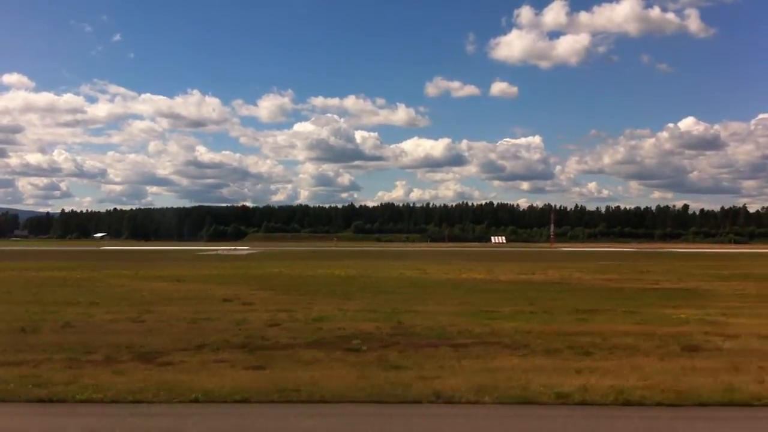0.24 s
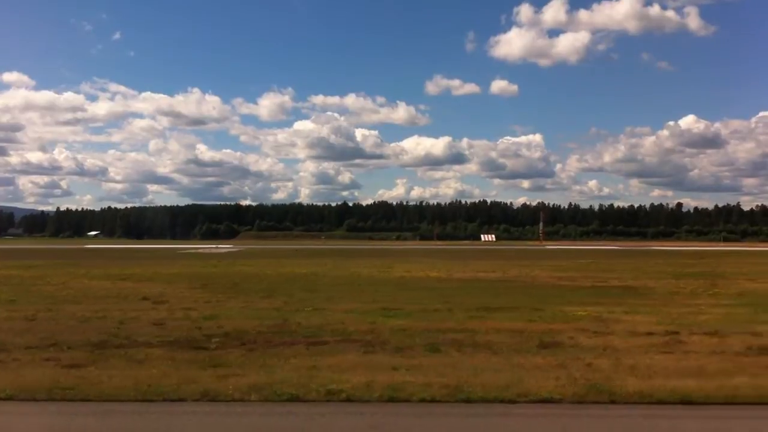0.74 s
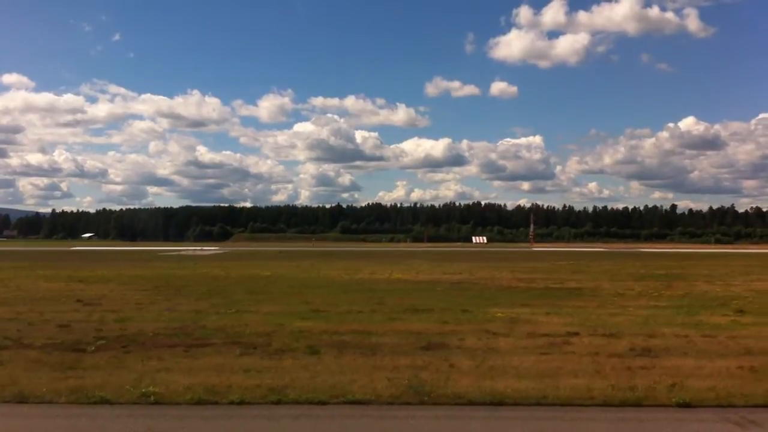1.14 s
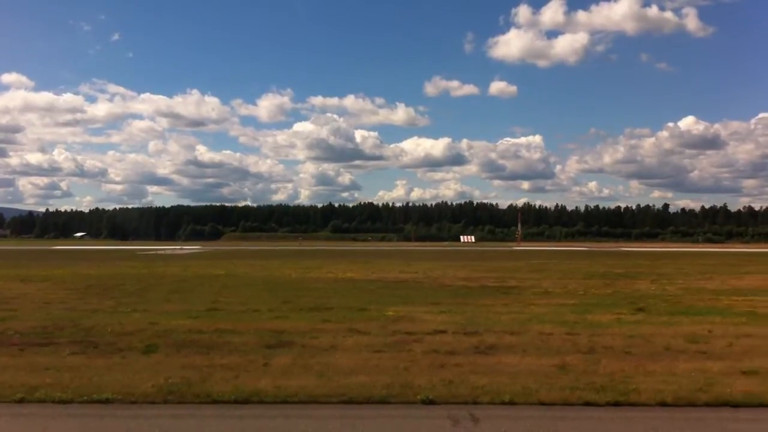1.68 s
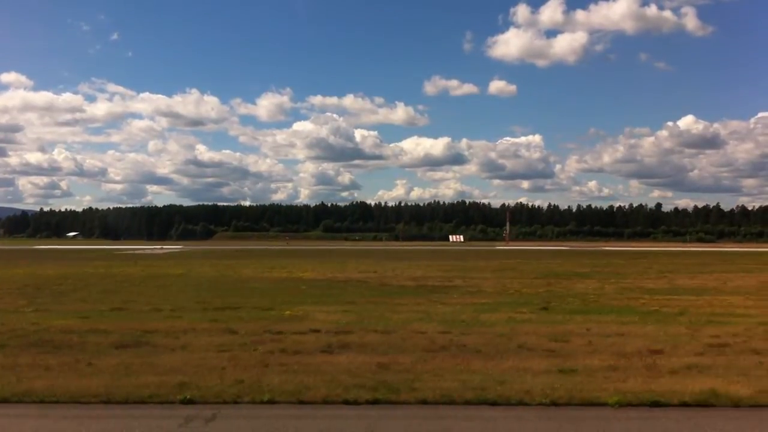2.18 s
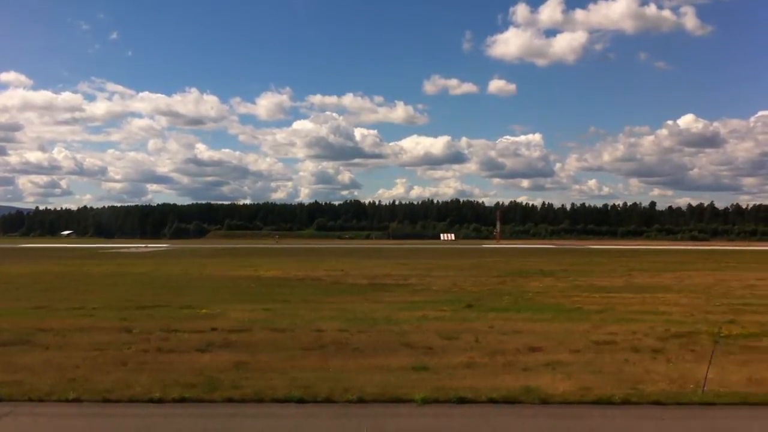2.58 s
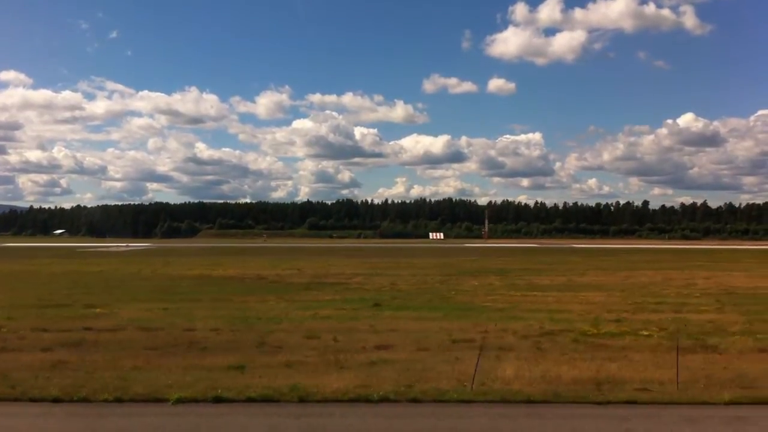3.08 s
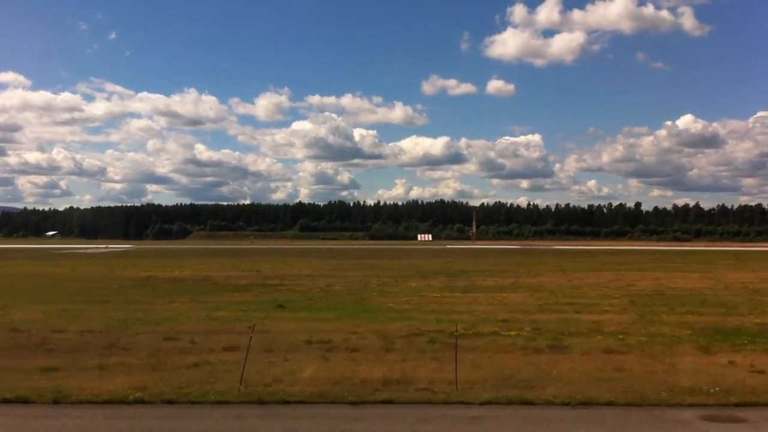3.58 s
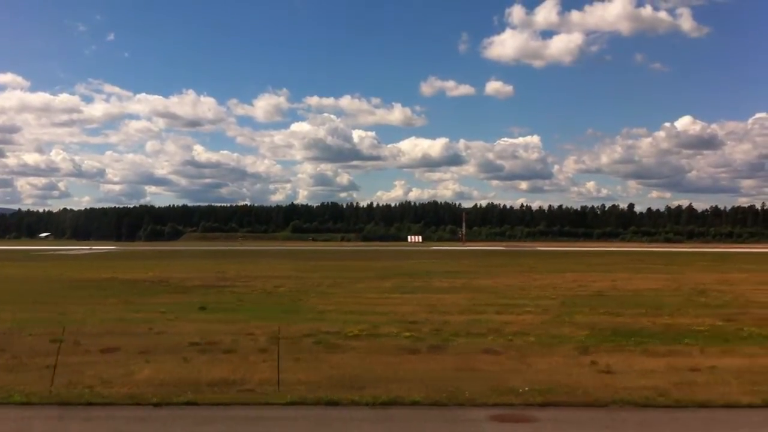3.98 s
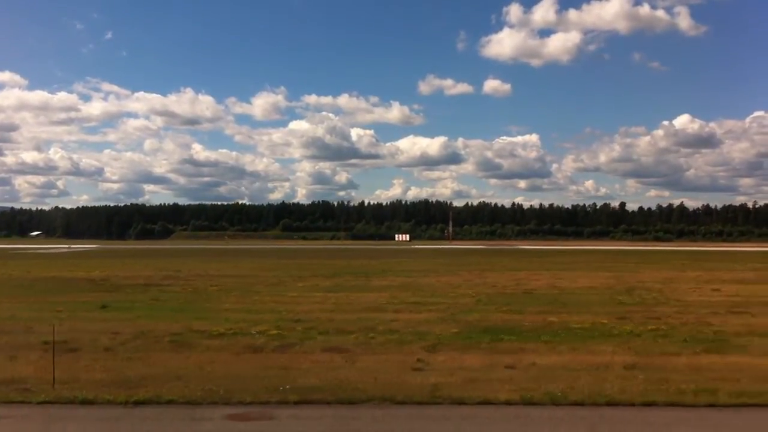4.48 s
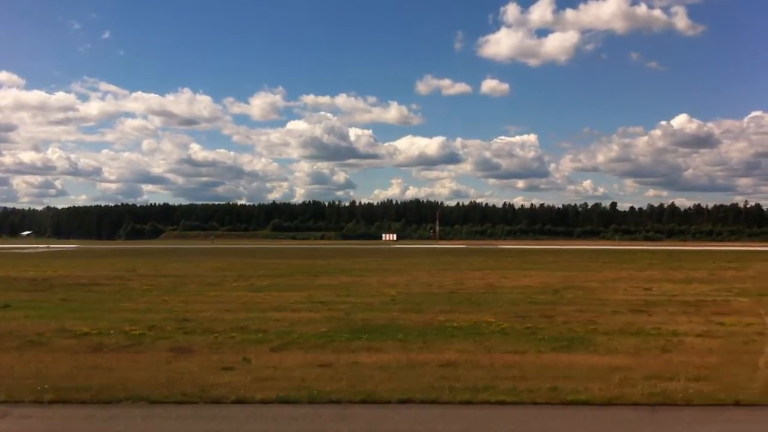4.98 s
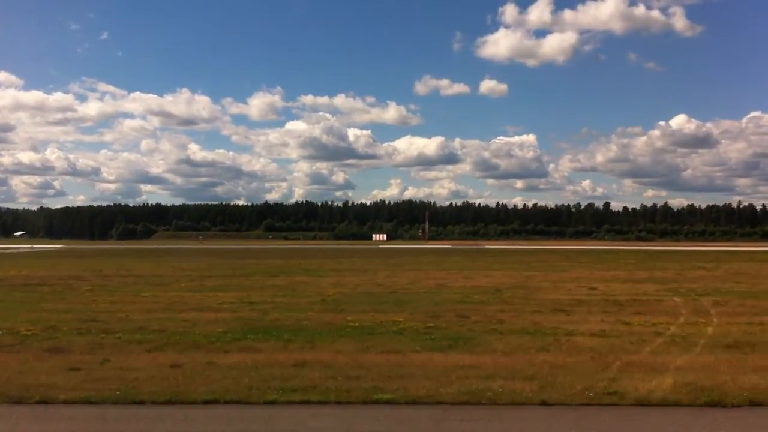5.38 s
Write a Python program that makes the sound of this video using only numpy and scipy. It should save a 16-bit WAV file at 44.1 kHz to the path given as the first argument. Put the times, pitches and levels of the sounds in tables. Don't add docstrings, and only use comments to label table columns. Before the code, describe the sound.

A jet's deep hum swells and then weakens as its engine winds down, with cabin rumble, faint duct whistles and a small trim buzz turning to ticks.

```python
import sys
import numpy as np
from scipy import signal
from scipy.fft import rfft, irfft
from scipy.io import wavfile
from scipy.ndimage import uniform_filter1d

SR = 44100
rng = np.random.default_rng(int(sys.argv[2]) if len(sys.argv) > 2 else 0)


def makeup_ratio(level_db):
    decades = np.asarray(level_db, float) / 20
    return 10 ** decades


def int16_out(signal):
    q = np.round(np.clip(np.atleast_2d(signal).T, -1, 1) * 32767)
    wavfile.write(sys.argv[1], SR, q.astype(np.int16))


N = 248724

START_SPEED, IDLE_SPEED, WIND_DOWN_S = 177.2, 100.0, 12.0
# (time [s], level [dB])
DRONE_LEVEL = [
    (0.0, -18.5),
    (0.47, -12),
    (1.0, -14),
    (1.7, -13),
    (2.15, -22),
    (3.0, -23.5),
    (4.0, -23),
    (5.64, -24),
]
# (time [s], half width [s], depth [dB])
DRONE_NULLS = [
    (2.22, 0.074, 8.5),
    (2.8, 0.034, 2),
    (3.13, 0.048, 22),
    (3.76, 0.064, 9),
    (3.9, .03, 11),
    (4.26, 0.1, 12),
    (4.8, 0.049, 4.5),
    (5.08, 0.097, 12),
]
TONE_MULTIPLES = [2, 2.31, 3, 4]
# (time [s], half width [s], peak [dB])
TONE_SWELLS = [
    [(0, 0.11, -41), (1.2, .13, -31.5), (1.72, 0.16, -27), (2.25, 0.14, -33), (2.9, .13, -34.5),
     (3.38, .12, -33.5), (3.95, 0.094, -37), (4.65, 0.093, -37.5), (5.2, .08, -35)],
    [(0, 0.093, -46), (.42, .12, -36), (.95, 0.19, -35), (1.38, 0.1, -32), (1.8, 0.097, -35),
     (2.2, 0.11, -35), (3.0, 0.15, -37), (3.4, 0.11, -35.5), (3.92, 0.17, -37), (4.4, 0.1, -38.5),
     (5.1, 0.14, -41)],
    [(.6, .2, -44.5), (1.2, 0.045, -45), (2.1, 0.31, -46), (2.92, 0.1, -41), (3.4, .08, -49)],
    [(1.38, .15, -42.5), (3.6, 0.1, -50)],
]
# (time [s], half width [s], peak [dB])
BLADE_SWELLS = [
    (.56, .05, -66),
    (.72, .06, -65.5),
    (.88, .015, -68),
    (.96, .02, -74),
]
# (frequency [Hz], density [dB per Hz])
RUMBLE_SPECTRUM = [(20, -87.5), (50, -75.5), (100, -62), (118, -58), (135, -48.5), (190, -47), (280, -50),
                   (305, -56.5), (420, -61), (510, -66), (640, -65.5), (700, -68), (850, -70.5),
                   (1300, -140)]
# (frequency [Hz], density [dB per Hz])
HISS_SPECTRUM = [(700, -83), (950, -68), (1500, -69), (1650, -72.5), (2100, -75.5), (2700, -78.5),
                 (3200, -82), (4100, -79.5), (4800, -85.5), (5600, -87.5), (7200, -92.5), (9500, -94),
                 (11200, -95), (15700, -101)]
# (frequency [Hz], fall [dB])
HISS_LOSS = [(900, 1), (2000, 2.5), (4000, 4.5), (8000, 6), (15000, 6)]
# (frequency [Hz], width [Hz])
STRONG_DUCTS = [(572, 30), (1468, 20), (1325, 25)]
# (mean level [dB], wander [dB])
STRONG_FLOW = [(-46, 2.5), (-47.5, 0.5), (-56.5, 5)]
# (time [s], half width [s], peak [dB])
DUCT_GUSTS = [
    [(1.75, 0.11, -49.5), (2.7, 0.26, -53), (3.07, 0.044, -47), (4.9, 0.18, -46.5), (5.3, 0.29, -46.5)],
    [(.2, 0.096, -50), (.7, 0.026, -40), (1.2, 0.066, -46), (2.1, 0.078, -49.5), (2.6, .06, -68),
     (3.4, 0.63, -49), (4.0, 0.13, -58), (4.38, 0.038, -51), (5.48, 0.03, -57)],
    [(1.13, .05, -48), (2.5, 0.063, -48), (4.5, 0.054, -50.5), (4.73, 0.036, -53)],
]
# (frequency [Hz], width [Hz], level [dB], wander [dB])
WEAK_DUCTS = [(792, 11, -58, 2.5), (1082, 70, -50, 2), (2867, 200, -55.5, -0.2), (643.4, 33, -51.5, 0)]
# (time [s], level [dB])
HUM_LEVEL = [
    (0, -47),
    (.7, -49.5),
    (1.0, -67.5),
    (5.64, -72),
]
# (time [s], level [dB])
BUZZ_LEVEL = [
    (0, -65.5),
    (1.2, -65),
    (1.45, -62.5),
    (2.3, -62.5),
    (2.7, -65.5),
    (2.78, -75),
    (3.1, -110),
]
# (time [s], half width [s], depth [dB])
BUZZ_LIFTS = [
    (.06, .015, 7),
    (.25, .015, 15),
    (.41, .02, 8.5),
    (.88, .02, 5),
    (1.13, 0.017, 4),
    (1.26, .025, 15.5),
    (1.97, .01, 3.5),
    (2.06, 0.0083, 5.5),
    (2.46, .025, 10),
    (2.6, .015, 10.5),
]
# (time [s], peak [dB])
TRIM_TICKS = [
    (2.9994, -49.5),
    (3.1794, -52),
    (3.3194, -49),
    (3.4994, -50.5),
    (4.2602, -49),
    (4.5494, -54),
    (4.6794, -50),
    (5.0364, -46),
]
# (frequency [Hz], width [Hz], level [dB])
TRIM_RINGS = [(12750, 800, 2), (13900, 700, -2), (15000, 1600, -1)]
# (frequency [Hz], threshold [dB])
DROPOUT_THRESHOLD = [(5000, -12), (7000, -7), (9000, -5.5), (11200, -3.8), (12800, -5), (15000, -3.2)]


def rms_one(x):
    return x / np.sqrt(np.mean(x ** 2) + 1e-20)


def in_time(rows):
    times, levels = np.transpose(rows)
    return np.interp(np.arange(N) / SR, times, levels)


def at_hz(points, hz):
    table_hz, table_db = np.transpose(points)
    return np.interp(np.log(hz + 1), np.log(table_hz), table_db, left=-140)


def bells(rows):
    t = np.arange(N) / SR
    return sum(top * np.exp(-0.5 * ((t - s) / width) ** 2) for s, width, top in rows)


def swells(rows):
    return bells([(s, width, makeup_ratio(db)) for s, width, db in rows])


def drift(rate):
    r = np.exp(-80 * np.pi * rate / SR)
    noise = rng.standard_normal(N // 40 + 2002)
    slow = signal.lfilter([1], [1, -2 * r, r * r], noise)[2000:]
    return np.interp(np.arange(N) / 40, np.arange(len(slow)), rms_one(slow))


def resonate(x, hz, width_hz):
    r = np.exp(-np.pi * width_hz / SR)
    feed = (1 - r * r) / 2 * np.array([1, 0, -1])
    return signal.lfilter(feed, [1, -2 * r * np.cos(2 * np.pi * hz / SR), r * r], x)


def noise_spectrum(points):
    hz = np.arange(N // 2 + 1) * SR / N
    white = rfft(rng.standard_normal(N))
    return white * makeup_ratio(at_hz(points, hz)) * np.sqrt(SR / 2), hz


def shaft_tones(turns):
    drone = makeup_ratio(in_time(DRONE_LEVEL) - bells(DRONE_NULLS) - 0.42 * drift(5.5))
    higher = [swells(rows) * makeup_ratio(1.5 * drift(8.6)) for rows in TONE_SWELLS]
    gains = [drone] + higher + [swells(BLADE_SWELLS)]
    multiples = [1] + TONE_MULTIPLES + [49]
    return sum(np.sqrt(2) * gain * np.cos(2 * np.pi * k * turns) for k, gain in zip(multiples, gains))


def rumble():
    spectrum, _ = noise_spectrum(RUMBLE_SPECTRUM)
    return irfft(spectrum, N) * makeup_ratio(0.48 * drift(4.4))


def hiss(slowing, patchy_db):
    spectrum, hz = noise_spectrum(HISS_SPECTRUM)
    out = 0
    together = drift(0.67)
    for centre_hz in 500 * 2.0 ** np.arange(6):
        share = np.clip(1 - np.abs(np.log2((hz + 1) / centre_hz)), 0, 1)
        loss_db = slowing * at_hz(HISS_LOSS, centre_hz).clip(0)
        gain_db = -loss_db + patchy_db * (together + drift(3.7))
        out = out + irfft(spectrum * share, N) * makeup_ratio(gain_db)
    return out


def whistle(hz, width_hz):
    once = resonate(rng.standard_normal(N), hz, width_hz)
    tone = resonate(once, hz, 1.54 * width_hz)
    return tone / np.sqrt(uniform_filter1d(tone ** 2, size=SR // 9))


def ducts():
    out = 0
    for (db, wander_db), gusts, (hz, width_hz) in zip(STRONG_FLOW, DUCT_GUSTS, STRONG_DUCTS):
        flow = makeup_ratio(db + wander_db * drift(2.2)) + swells(gusts)
        out = out + flow * whistle(hz, width_hz)
    for hz, width_hz, db, wander_db in WEAK_DUCTS:
        out = out + makeup_ratio(db + wander_db * drift(1.5)) * whistle(hz, width_hz)
    return out


def electrical_hum():
    return np.sqrt(2) * makeup_ratio(in_time(HUM_LEVEL)) * np.sin(2 * np.pi * 805 * np.arange(N) / SR)


def loose_trim(turns):
    touch = np.flatnonzero(np.diff(np.floor(turns - 0.4)))
    chance = rng.standard_normal((len(touch), 2))
    touch = (touch + 0.0003 * SR * chance[:, 0]).astype(int).clip(0, N - 1)
    buzz_db = in_time(BUZZ_LEVEL) - bells(BUZZ_LIFTS)
    clicks = np.full(N, 1e-18)
    clicks[touch] = makeup_ratio(buzz_db[touch] + 18 + 0.7 * chance[:, 1])
    for s, db in TRIM_TICKS:
        clicks[round(s * SR)] = makeup_ratio(db + 2)
    scratch = signal.lfilter([1], [1, -0.97], clicks) * rng.standard_normal(N)
    rings = sum(makeup_ratio(db) * resonate(scratch, hz, width_hz) for hz, width_hz, db in TRIM_RINGS)
    return signal.sosfilt(signal.butter(4, 11500, "high", fs=SR, output="sos"), rings)


def scene():
    t = np.arange(N) / SR
    speed = IDLE_SPEED + (START_SPEED - IDLE_SPEED) * np.exp(-t / WIND_DOWN_S)
    turns = np.cumsum(speed) / SR
    slowing = (speed[0] - speed) / (speed[0] - speed[-1])
    engine = shaft_tones(turns) + rumble() + hiss(slowing, patchy_db=0.75)
    cabin = ducts() + electrical_hum() + loose_trim(turns)
    return (engine + cabin)[None]


def dropouts(x):
    hz, _, cells = signal.stft(x, SR, nperseg=2048, noverlap=1536)
    power = uniform_filter1d(np.abs(cells) ** 2, size=8, axis=0) + 1e-20
    recent = uniform_filter1d(uniform_filter1d(power, size=31, axis=1), size=31, axis=0)
    memory = 0.22
    usual = recent ** (1 - memory) * recent.mean(axis=1, keepdims=True) ** memory
    lost = power < usual * makeup_ratio(2 * at_hz(DROPOUT_THRESHOLD, hz))[:, None]
    kept = (1 - uniform_filter1d(1.0 * lost, size=3, axis=1) * 2).clip(0, 1)
    return signal.istft(cells * kept, SR, nperseg=2048, noverlap=1536)[1][:N]


def top_cut(x):
    return signal.sosfilt(signal.butter(12, 15790, fs=SR, output="sos"), x)


def record(dry):
    mix = dropouts(dry[0])[None]
    return top_cut(mix)


dry = scene()
out = record(dry)
int16_out(out)
```